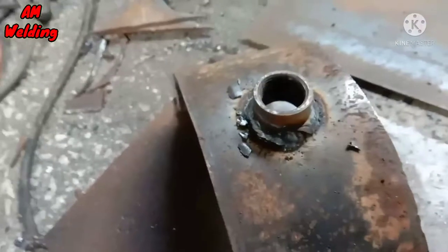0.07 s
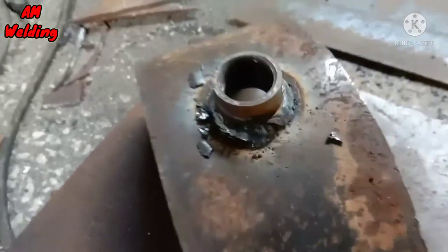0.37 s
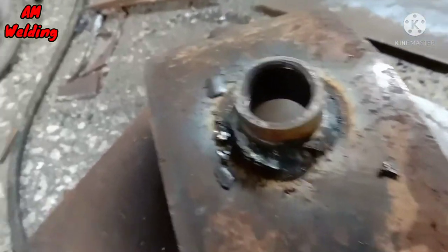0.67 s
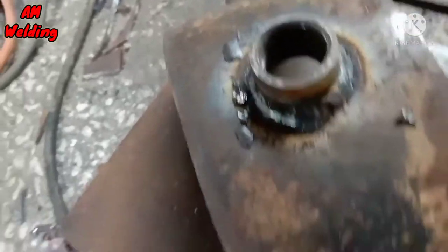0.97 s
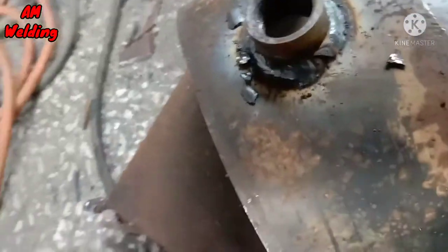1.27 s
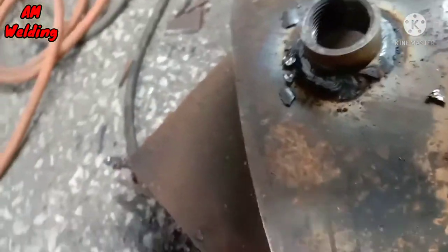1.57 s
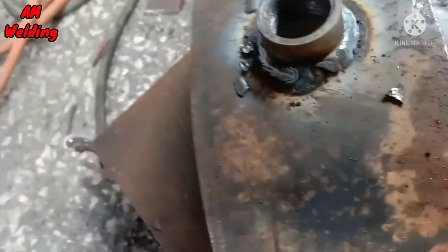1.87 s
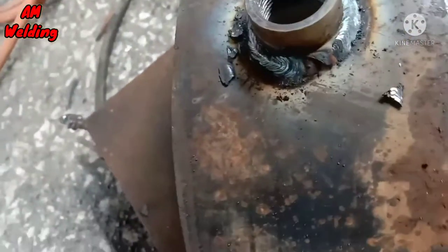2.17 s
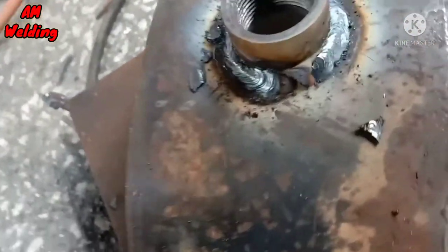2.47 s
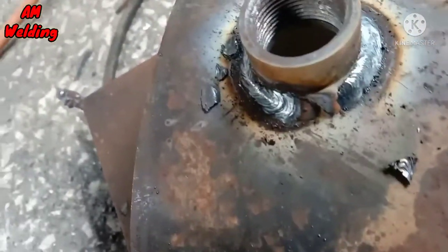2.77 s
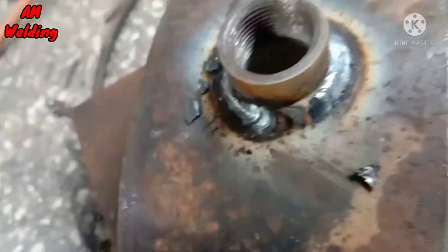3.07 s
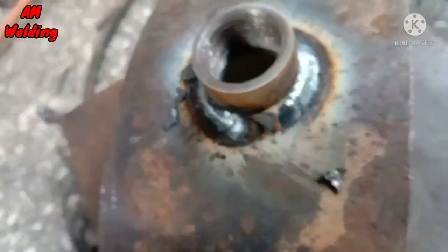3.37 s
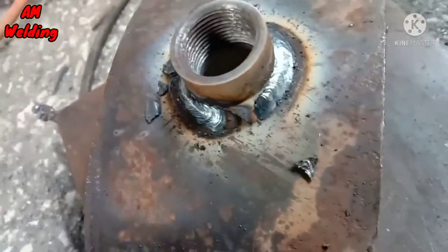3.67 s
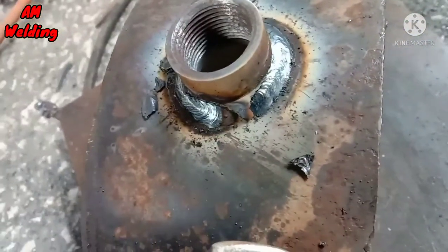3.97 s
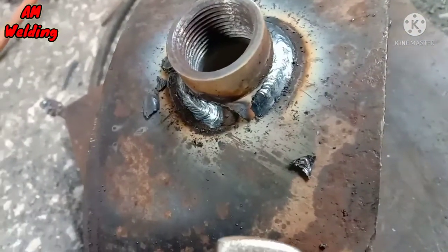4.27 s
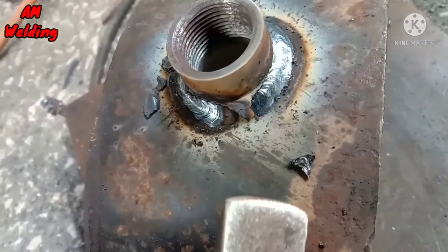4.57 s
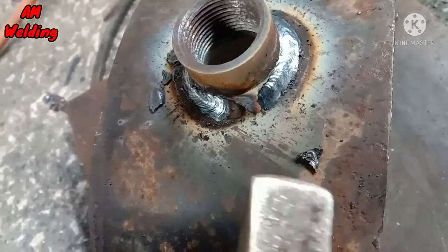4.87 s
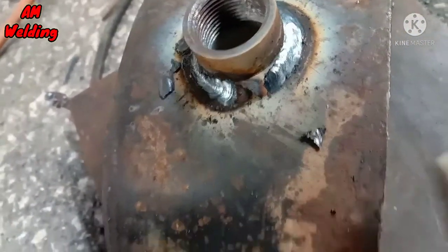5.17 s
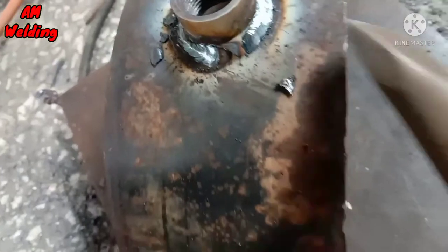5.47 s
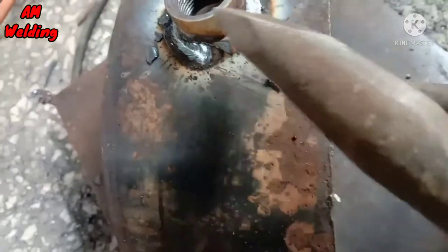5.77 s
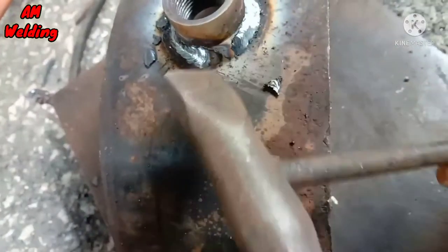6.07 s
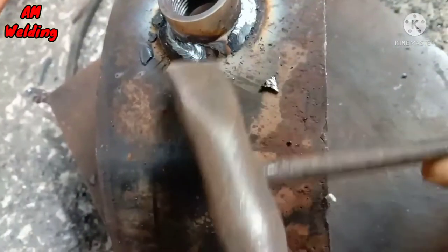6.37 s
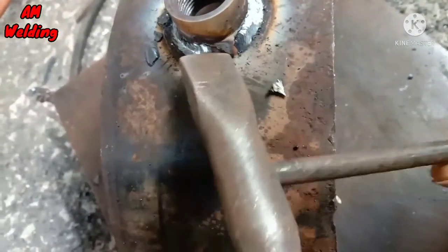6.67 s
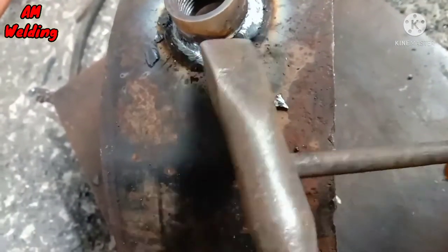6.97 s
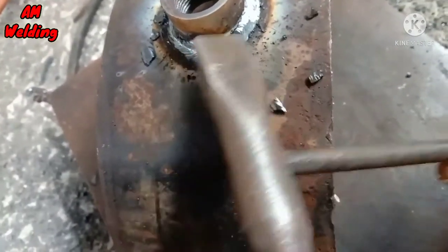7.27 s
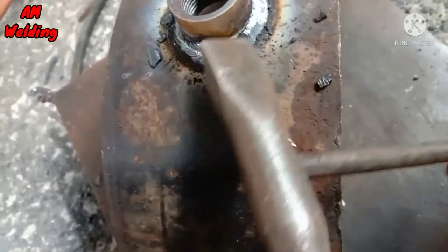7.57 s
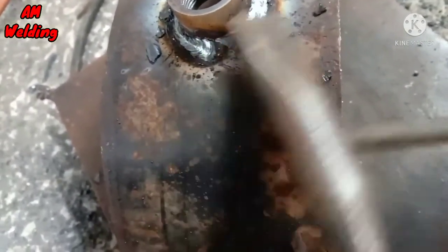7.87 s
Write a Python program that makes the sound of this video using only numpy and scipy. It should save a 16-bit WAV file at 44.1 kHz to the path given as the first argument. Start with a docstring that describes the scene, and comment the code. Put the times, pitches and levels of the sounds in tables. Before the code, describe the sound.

Workshop machinery runs quietly for the whole eight seconds: an airy hiss, a low hum and rumble, and a thin, wavering high whine. During the first second or so, small grains of grit snap and crackle, with a sharper snap right at the start and a short, gritty scuff on the floor at about 1.1 seconds. A few tiny, faint ticks follow just before 2 seconds. Then only the machines are heard. From about 6.3 seconds, a chipping hammer strikes a weld on a steel shell close by, six loud blows at roughly 6.3, 6.5, 6.8, 7.1, 7.4 and 7.7 seconds. They vary in force and brightness, mixing a metallic clank, cracking slag and a dull thud, while a high ring sings on between them. The shell knocks faintly on its support, and the walls add a short echo.

```python
"""Chipping slag off a weld

Workshop machines hum and whine throughout. Grit snaps by brittle fracture and something scuffs
over the floor. Then a chipping hammer strikes a steel shell close by: six ringing blows, each
exciting the damped modes of shell and hammer head. The walls echo; gain control squeezes each blow."""
import sys
import numpy as np
from scipy import signal
from scipy.fft import rfft, irfft
from scipy.io import wavfile
from scipy.ndimage import uniform_filter1d

SR = 44100
rng = np.random.default_rng(int(sys.argv[2]) if len(sys.argv) > 2 else 0)


def transcribe(signal):
    """Save signal, clipped to [-1, 1], as a 16-bit WAV file at the path in sys.argv[1]."""
    frames = np.atleast_2d(signal).T
    limited = np.clip(frames, -1, 1)
    pcm = np.round(limited * 32767).astype(np.int16)
    wavfile.write(sys.argv[1], SR, pcm)


N = 349272
TIME = np.arange(N) / SR

# Hammer contacts, some in close pairs: t/s, force/dB, treble slope/(dB/octave), cut-off f/Hz,
# head level/dB, thud level/dB, damping (factor on the decay rate of the shell's main modes)
BLOWS = [(6.2642, -13, 6, 13100, -24.5, -1.5, 1.24), (6.322, -19, -12, 4000, -24, -38, 3),
         (6.5326, -18.5, -0.5, 11300, -38.5, -14, 2.55), (6.7846, -22, 3, 12500, -42, -18, 1.64),
         (6.7916, -6, -7.5, 9000, -17.5, -8, 2.25), (7.0577, -9.5, -1, 11300, -18.5, -7, 0.89),
         (7.3779, -9, -11.5, 13000, -19, -8, 0.92), (7.6647, -20.5, 8.5, 6200, -31.5, -3.5, 1.7)]
# Spectrum of the shell's weak modes and of cracking slag: f/Hz, relative level/dB
CLASH_SPECTRUM = [(500, -29), (1500, 11.5), (2800, 0.5), (4300, -30), (5700, -10), (6600, -22),
                  (7400, -4.5), (8200, -32), (9200, -7.5), (12000, -32), (15500, -23)]


def amp(db):
    """Amplitude ratio of a level in decibels."""
    return 10 ** (np.asarray(db) / 20)


def unit(x):
    """Normalisation to rms 1."""
    return x / np.sqrt(np.mean(x ** 2) + 1e-20)


def read(points, hz):
    """Interpolation on a logarithmic frequency axis."""
    f, value = np.transpose(points)
    return np.interp(np.log(hz + 1), np.log(f + 1), value)


def level(curve):
    """Amplitude envelope, interpolated in decibels."""
    return amp(np.interp(TIME, *np.transpose(curve)))


def add(mix, s, sound):
    """Superposition of a sound starting at time s."""
    part = mix[round(s * SR):][:len(sound)]
    part += sound[:len(part)]


def colour(x, spectrum):
    """Spectral shaping, normalised to rms 1."""
    gain = amp(read(spectrum, np.fft.rfftfreq(len(x), 1 / SR)))
    return unit(irfft(rfft(x) * gain, len(x)))


def fade(t, t60):
    """Exponential decay: 60 dB in t60."""
    return np.exp(-np.log(1000) * t / t60)


def patchy(x, depth_db, frames, bins):
    """Random modulation: patches of the spectrum, frames long and bins wide, swell and sink."""
    z = signal.stft(x, SR, nperseg=1024, noverlap=768)[2]
    field = uniform_filter1d(rng.standard_normal(z.shape), bins, 0)
    field = unit(uniform_filter1d(field, frames, 1))
    return unit(signal.istft(z * amp(depth_db * field), SR, nperseg=1024, noverlap=768)[1][:N])


def waver(hz, count=24):
    """Slow sinusoids near hz beat to give an irregular wobble of rms 1."""
    rates, t = hz * rng.uniform(.5, 1.5, (count, 1)), TIME[::100]
    wobble = np.sin(2 * np.pi * (rates * t + rng.random((count, 1)))).sum(0)
    return unit(np.interp(TIME, t, wobble))


def resonant_noise(peaks):
    """Narrow resonances driven by white noise sing at their own frequencies."""
    f = np.fft.rfftfreq(N, 1 / SR)
    gain = sum(amp(db) / (1 + ((f - hz) / width) ** 2) for hz, width, db in peaks)
    return unit(irfft(rfft(rng.standard_normal(N)) * gain, N))


def workshop(air_db=1, rumble_db=2, drone_db=5.0, whine_db=4.5, shrill_db=0.5, waver_db=2.5):
    """Machine noise is a superposition of broad bands, noise-driven resonances and a low pure tone."""
    # Broad noise spectra: f/Hz, relative density level/dB
    air_bands = [(25, -46), (55, -7), (85, -7), (160, 1), (230, -4.5), (500, 0.5), (1100, 0.5), (1500, -13),
                 (2000, -10.5), (3200, -7.5), (4500, -8), (5700, -22), (6500, -18.5), (10500, -19),
                 (12800, -35), (15000, -27)]
    rumble_bands = [(60, -30), (120, -10), (160, 3.5), (215, -6), (290, 0), (420, -16), (900, -46)]
    # Machine resonances: f/Hz, half-width/Hz, relative level/dB
    drone_peaks = [(1256.3, 36.8, -5.5), (439, 23, -13.5)]
    whine_peaks = [(1611, 104, -0.5), (3834, 15, 7.5), (3753, 56, -6.5), (4038, 51, 2.5), (4247, 16.5, 3.5),
                   (3164, 14.4, -1), (7610, 150, -11), (9210, 410, -12)]
    shrill_peaks = [(4701, 42, 6.5), (4794, 10.7, 1), (4950, 24, 0.5), (5255, 46, 3), (5470, 11.5, 4.5),
                    (5747, 148, -5.5)]
    # Envelopes: t/s, relative level/dB
    air_curve = [(0, -52.5), (5.9, -51.5), (6.6, -50.5)]
    rumble_curve = [(0.0, -60.5), (0.9, -61.5), (1.37, -53.5), (2.58, -59.5), (7.68, -57), (7.92, -74)]
    drone_curve = [(0.0, -55), (0.44, -54.5), (0.99, -57.5), (1.25, -56), (3.24, -58.5), (3.48, -54.5),
                   (3.81, -58.5), (5.45, -56.5), (5.6, -51), (6.55, -54.5), (6.68, -49), (7.92, -53)]
    whine_curve = [(0.0, -57.5), (1.02, -59.5), (1.31, -58), (2.39, -60), (2.84, -54.5), (5.21, -56.5),
                   (6.1, -62.5)]
    shrill_curve = [(0.0, -54.5), (0.85, -53.5), (1.32, -53.5), (1.53, -48.5), (1.73, -54.5), (2.99, -56),
                    (3.16, -53), (5.78, -55), (6.1, -51)]
    # Hum: f/Hz, rms level/dB
    hum_tones = [(100, -66.5)]
    air = patchy(colour(rng.standard_normal(N), air_bands), depth_db=4.5, frames=10, bins=4)
    rumble = patchy(colour(rng.standard_normal(N), rumble_bands), depth_db=5.5, frames=12, bins=3)
    drone = amp(waver_db * waver(hz=6)) * resonant_noise(drone_peaks)
    whine = patchy(resonant_noise(whine_peaks), depth_db=2.5, frames=24, bins=5)
    shrill = patchy(resonant_noise(shrill_peaks), depth_db=3.0, frames=20, bins=6)
    hum = sum(amp(db) * unit(np.sin(2 * np.pi * (hz * TIME + rng.random()))) for hz, db in hum_tones)
    return (amp(air_db) * level(air_curve) * air
            + amp(rumble_db) * level(rumble_curve) * rumble
            + amp(drone_db) * level(drone_curve) * drone
            + amp(whine_db) * level(whine_curve) * whine
            + amp(shrill_db) * level(shrill_curve) * shrill + hum)


def crushing(bite_db_per_s=1000, release_db_per_s=283, trickle_db=-22, trickle_t60_per_length=36):
    """Incoherent scuffs add in power; each envelope bites, holds, lets go and trails off as a trickle."""
    # Scuffs on the floor: t/s, length/s, level/dB
    scuffs = [(0.066, 0.0039, -42), (0.224, 0.11, -45), (1.112, 0.061, -25.5)]
    power = np.zeros(N)
    for s, length, db in scuffs:
        before, after = np.maximum(s - TIME, 0), np.maximum(TIME - s - length, 0)
        trickle = amp(trickle_db) * fade(after, trickle_t60_per_length * length)
        release = amp(-release_db_per_s * after) + trickle
        power += (amp(db - bite_db_per_s * before) * release) ** 2
    return np.sqrt(power)


def scuffing(grains_per_s=7000, clump_db=1.5, coarse_per_s=35, coarse_db=-19, coarse_t60=0.024):
    """Shot noise: a scuff crushes a multitude of fine grains in clumps, and a few coarse ones."""
    # Crushed grit: f/Hz, relative density level/dB
    spectrum = [(59, -60), (100, -30), (487, -24), (808, -38), (977, -15.5), (1160, -19.5), (1290, -5),
                (1590, -12.5), (2090, -10.5), (3120, -17), (3390, -12.5), (4370, -22), (5280, -18),
                (15500, -41.5)]
    clumps = unit(uniform_filter1d(rng.standard_normal(N), size=200))
    sizes = amp(2 * rng.exponential(1, N) + clump_db * clumps) * rng.choice([-1, 1], N)
    fine = colour(sizes * (rng.random(N) < grains_per_s / SR), spectrum)
    t = np.arange(SR // 10) / SR
    burst = rng.standard_normal(len(t)) * fade(t, coarse_t60)
    impulses = sizes * (rng.random(N) < coarse_per_s / SR)
    coarse = colour(signal.fftconvolve(impulses, burst)[:N], spectrum)
    crush = crushing()
    # the coarse grains stand out more as the crushing dies away
    return fine * crush + amp(coarse_db) * coarse * crush ** 0.63


def click(spectrum, size=2048):
    """Minimum phase gives the sharpest causal pulse with this spectrum, at peak 1."""
    log_gain = np.log(amp(read(spectrum, abs(np.fft.fftfreq(size, 1 / SR)))))
    pulse = np.fft.ifft(np.exp(np.conj(signal.hilbert(log_gain)))).real[:size // 2]
    return pulse / abs(pulse).max()


def snapping(crumble=0.31, crumble_t60=0.048, chink_db=-7, chink_t60=0.024, cutoff_ratio=1.46):
    """Brittle fracture: single grains of grit crack, chink and crumble."""
    # Breaking grains: t/s, relative level/dB, chink f/Hz
    snaps = [(0.0742, -8.5, 3290), (0.0878, -23, 2970), (0.227, -23, 2400), (.246, -20, 2470),
             (0.2731, -21.5, 3300), (0.328, -24.5, 2400), (0.5855, -29, 3330), (0.7302, -24.5, 1370),
             (0.9458, -25, 1970), (1.12, -14, 2230), (1.165, -13, 1420), (1.189, -18, 2460)]
    # Fracture pulse: f/Hz, relative density level/dB
    spectrum = [(300, -35), (900, -30), (1400, -7.5), (2800, -3), (4500, 0), (7000, -8), (10000, -8.5),
                (13000, -28), (15500, -10)]
    out, t, pulse = np.zeros(N), np.arange(SR // 10) / SR, click(spectrum)
    for s, db, hz in snaps:
        fracture = crumble * rng.standard_normal(len(t)) * fade(t, crumble_t60)
        fracture[0] = 1
        # a larger grain chinks lower and cracks duller
        dull = signal.butter(1, min(cutoff_ratio * hz, .45 * SR), fs=SR)
        crack = signal.lfilter(*dull, signal.fftconvolve(fracture, pulse)[:len(t)])
        chink = amp(chink_db) * np.sin(2 * np.pi * hz * t) * fade(t, chink_t60)
        add(out, s, amp(db) * (crack + chink))
    return out


def ticks(t60=0.022, above_hz=9000):
    """Brief bursts of high-passed noise are heard as tiny, thin ticks."""
    # Bursts: t/s, level before filtering/dB
    bursts = [(1.6974, -45), (1.7827, -51), (1.903, -40)]
    out, t = np.zeros(N), np.arange(SR // 20) / SR
    for s, db in bursts:
        add(out, s, amp(db) * rng.uniform(-1, 1, len(t)) * fade(t, t60))
    return signal.sosfilt(signal.butter(2, above_hz, "high", fs=SR, output="sos"), out)


def shell_ring(t, damping):
    """Free vibration of the shell's normal modes; each point of impact weights them a little anew."""
    # Shell modes: f/Hz, relative level/dB, T60/s at damping 1
    modes = [(741, -13, .12), (941, -1, .09), (1010, -5, .06), (1215, -6, .07), (1270, -2.5, .08),
             (1561, -4.5, .19), (1584, -11, .27), (2240, 2.5, .18), (2428, -20, .28), (2560, -23, .5),
             (2760, -16, .1), (3993, -23, .7), (4659, -21, .42), (5265, -20.5, .48), (5392, -13, .45),
             (5798, -16.5, .42), (5880, -20, .42), (5970, -25, .4), (6356, -26, .36), (6702, -31, .34),
             (6842, -30, .32), (7257, -23, .14), (7777, -30, .3), (8473, -32, .25), (8830, -33, .3),
             (10910, -34, .25), (10978, -33, .3), (11320, -27.5, .33), (12397, -35, .3), (12868, -30, .27)]
    hz, db, t60 = np.transpose(modes)[:, :, None]
    gain = amp(db + rng.standard_normal(hz.shape))
    return (gain * np.sin(2 * np.pi * (hz * t + rng.random(hz.shape))) * fade(t * damping, t60)).sum(0)


def shell_clash(t, count=80):
    """High modal density: dozens of weak modes merge into a shimmer."""
    # Decay of the weak modes: f/Hz, T60/s
    decay = [(500, .1), (2500, 0.087), (6000, 0.29), (15000, 0.42)]
    hz = (np.linspace(1500, 15400, count) + rng.uniform(-150, 150, count))[:, None]
    gain = amp(read(CLASH_SPECTRUM, hz))
    gain /= np.linalg.norm(gain)
    return (gain * np.sin(2 * np.pi * (hz * t + rng.random(hz.shape))) * fade(t, read(decay, hz))).sum(0)


def contact(x, db_per_octave, cut_hz, knee_hz=2400):
    """Contact acts as a filter: bare steel favours high modes; slag cushions the blow and cuts the top."""
    f = np.fft.rfftfreq(2 * len(x), 1 / SR)
    tilt = amp(db_per_octave * np.log2(np.maximum(f / knee_hz, 1)))
    gain = tilt / np.sqrt(1 + (f / cut_hz) ** 9)
    return irfft(rfft(x, 2 * len(x)) * gain)[:len(x)]


def thud(t, rise, t60):
    """Heavily damped low modes of the shell and its rest overlap into a burst of dull noise."""
    # Thud: f/Hz, relative density level/dB
    spectrum = [(40, -54), (200, -22), (470, -19), (640, -8.5), (950, -0.5), (1300, -5.5), (1900, -12),
                (2800, -29), (4200, -22.5), (8000, -37), (16000, -57)]
    return colour(rng.standard_normal(len(t)), spectrum) * (1 - np.exp(-t / rise)) * fade(t, t60)


def hammering(clash_db=-12, crack_db=-10, crack_t60=0.05, rise_s=0.0029):
    """Impact excitation: each blow cracks slag and sets the shell ringing, shimmering and thudding."""
    out, t = np.zeros(N), np.arange(SR // 2) / SR
    shimmer = amp(clash_db) * shell_clash(t)
    for s, force_db, slope, cut_hz, _, thud_db, damping in BLOWS:
        crack = amp(crack_db) * colour(rng.standard_normal(len(t)), CLASH_SPECTRUM) * fade(t, crack_t60)
        steel = (shell_ring(t, damping) + shimmer + crack) * (1 - np.exp(-t / rise_s))
        add(out, s, amp(force_db) * contact(steel, slope, cut_hz))
        add(out, s, amp(thud_db) * thud(t, rise=0.008, t60=0.05))
    return out


def hammer_tip(hz=7300, base_db=-32, t60=0.072, follow=0.25):
    """A quickly damped mode of the tip tinks at every contact, a little louder with a heavier thud."""
    out, t = np.zeros(N), np.arange(SR // 4) / SR
    for s, *_, thud_db, _ in BLOWS:
        add(out, s, amp(base_db + follow * thud_db) * np.sin(2 * np.pi * hz * t) * fade(t, t60))
    return out


def hammer_head(handover_s=0.0015):
    """Lightly damped modes of the head sing on between blows; each contact resets their amplitude."""
    # Head modes: f/Hz, relative level/dB, T60/s at damping 1
    modes = [(3051, -8.5, 1.07), (3540, 0, 1.44)]
    out = np.zeros(N)
    for hz, db, t60 in modes:
        swing = np.zeros(N)
        for s, *_, head_db, _, damping in BLOWS:
            t = np.maximum(TIME - s, 0)
            old = np.exp(-t / handover_s)
            swing = old * swing + (1 - old) * amp(head_db + db) * fade(t * np.sqrt(damping), t60)
        out += swing * np.sin(2 * np.pi * (hz * TIME + rng.random()))
    return out


def rocking(rebound_s=0.046, rebound_db=-28.5, below_hz=1300):
    """Secondary impacts: the shell knocks dully on its rest after each blow, and at times between."""
    # Knocks between blows: t/s, relative level/dB
    knocks = [(6.435, -32), (6.668, -28.5), (7.869, -27.5)]
    out, t = np.zeros(N), np.arange(SR // 2) / SR
    # the shell drops back harder the more the hammer has pressed on it
    rebounds = [(s + rebound_s, damping * amp(thud_db + rebound_db)) for s, *_, thud_db, damping in BLOWS]
    for s, gain in rebounds + [(s, amp(db)) for s, db in knocks]:
        add(out, s, gain * thud(t, rise=0.0044, t60=0.079))
    return signal.sosfilt(signal.butter(2, below_hz, fs=SR, output="sos"), out)


def room(x, first_echo_s=0.023, echoes_per_s=2500):
    """Reverberation: sparse wall reflections decay at a rate set by frequency, the bass lasting longest."""
    # Reverberation time: f/Hz, T60/s
    decay = [(150, 0.97), (1000, 0.16), (2300, 0.27), (4000, 0.43), (14000, 0.16)]
    echoes = rng.choice([-1., 1.], SR) * (rng.random(SR) < echoes_per_s / SR)
    echoes *= np.arange(SR) / SR > first_echo_s
    hz, t, z = signal.stft(echoes, SR, nperseg=256)
    tail = signal.istft(z * fade(t, read(decay, hz)[:, None]), SR, nperseg=256)[1][:SR]
    return signal.fftconvolve(x, tail / np.linalg.norm(tail))[:N]


def scene():
    """Superposition of direct sound, reverberation and machine noise, in one channel."""
    steel = hammering() + hammer_tip() + rocking()
    floor = snapping() + scuffing() + ticks()
    direct = steel + hammer_head() + floor
    return (direct + room(amp(-8.5) * steel + amp(-19.5) * floor) + workshop())[None]


def record(dry, threshold_db=-22, share=0.23, recovery_db_per_s=55, bass_hz=55, edge_hz=15600, size=256):
    """Compression and band limiting: gain control ducks loud blows; the small microphone loses bass."""
    power_db = 10 * np.log10(abs(uniform_filter1d(dry[0] ** 2, size)) + 1e-12)
    fall = TIME * recovery_db_per_s
    held_db = np.maximum.accumulate(power_db + fall) - fall
    over_db = np.maximum(held_db - threshold_db, 0)
    ducked = dry / amp(share * uniform_filter1d(over_db, size))
    thin = signal.sosfilt(signal.butter(2, bass_hz, "high", fs=SR, output="sos"), ducked)
    low_pass = signal.firwin(511, edge_hz, window=("kaiser", 9), fs=SR)
    return signal.oaconvolve(thin, low_pass[None], "same")


dry = scene()
out = record(dry)
transcribe(out)
```